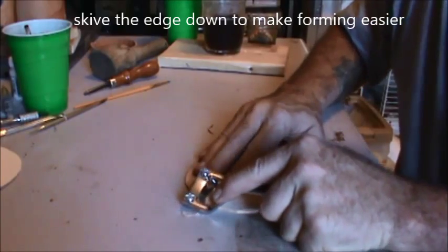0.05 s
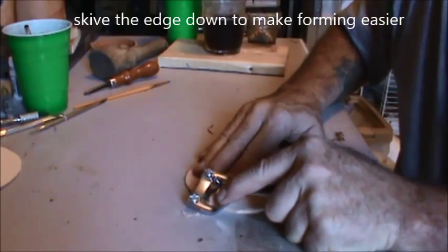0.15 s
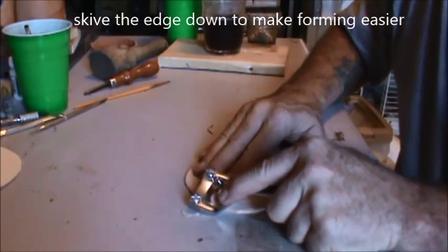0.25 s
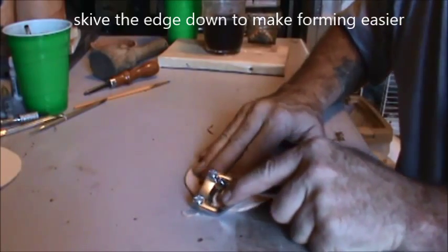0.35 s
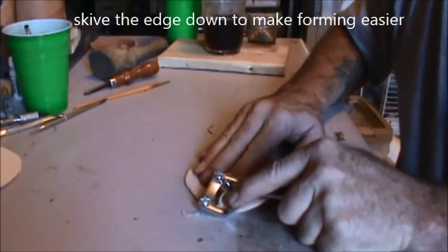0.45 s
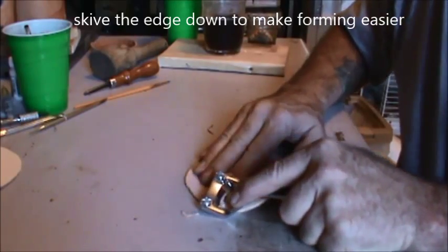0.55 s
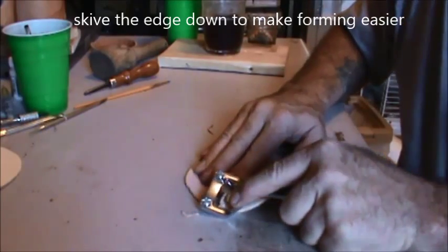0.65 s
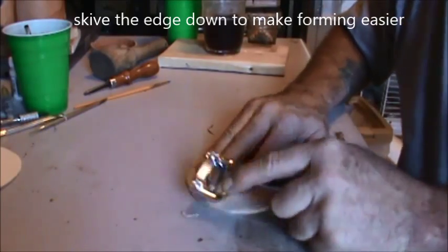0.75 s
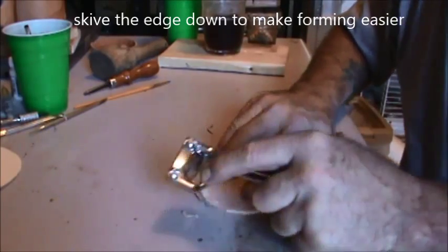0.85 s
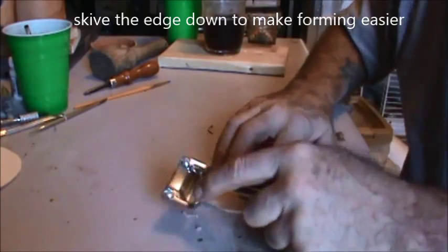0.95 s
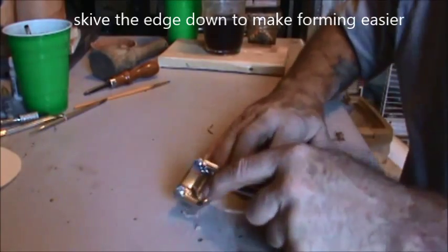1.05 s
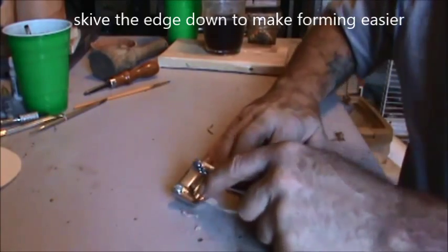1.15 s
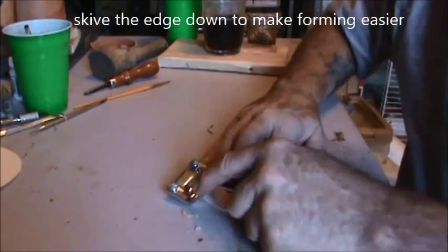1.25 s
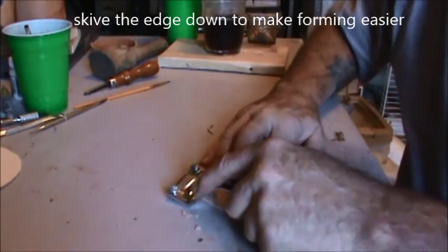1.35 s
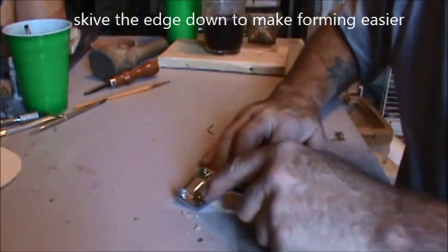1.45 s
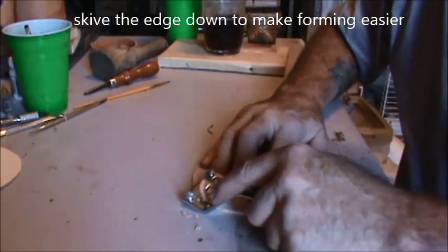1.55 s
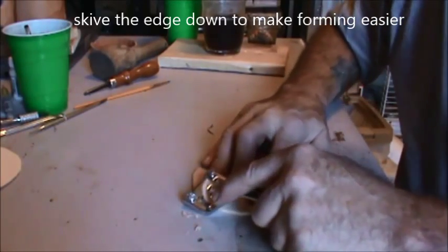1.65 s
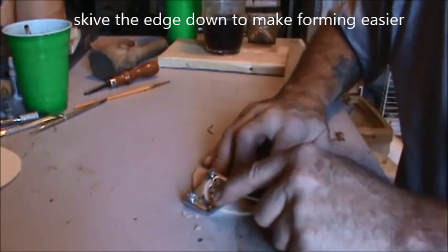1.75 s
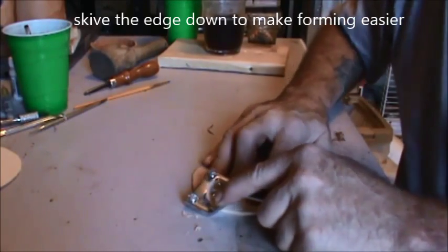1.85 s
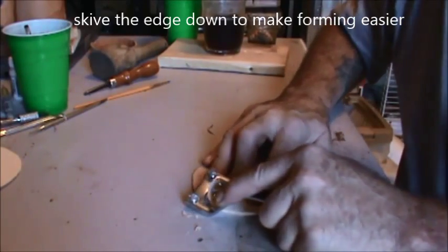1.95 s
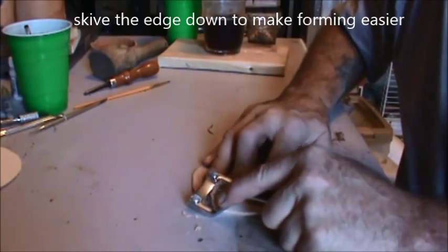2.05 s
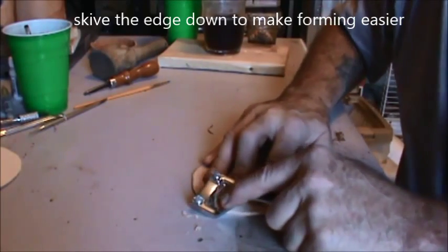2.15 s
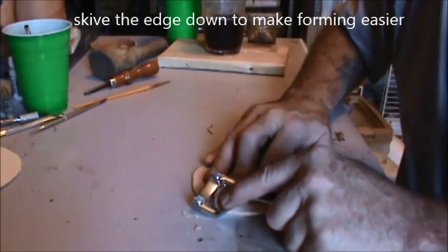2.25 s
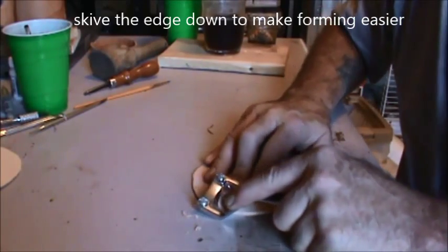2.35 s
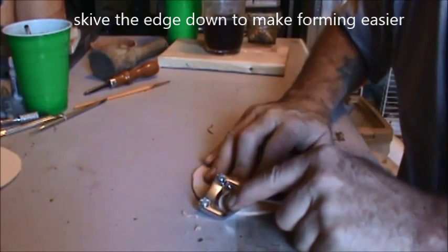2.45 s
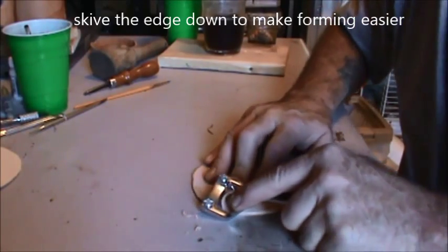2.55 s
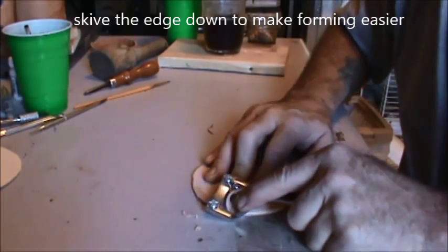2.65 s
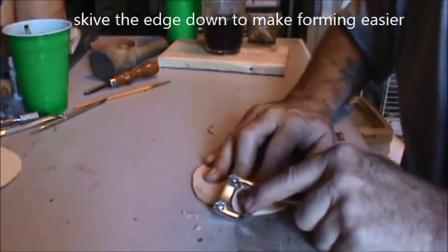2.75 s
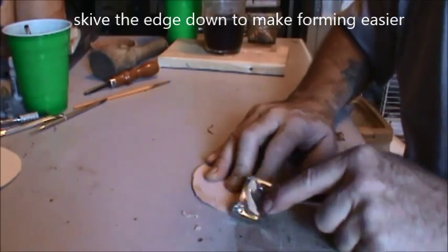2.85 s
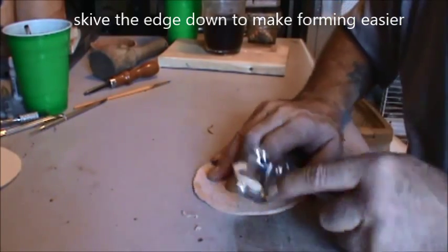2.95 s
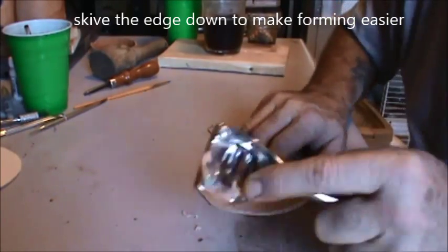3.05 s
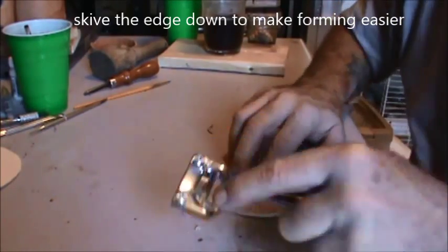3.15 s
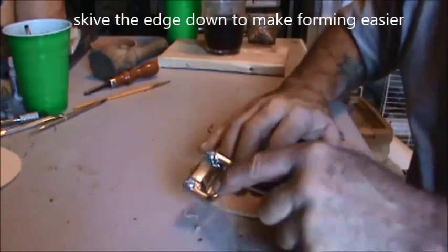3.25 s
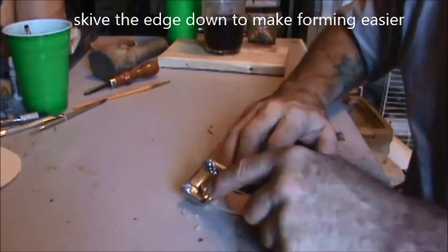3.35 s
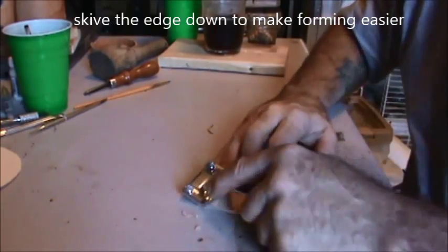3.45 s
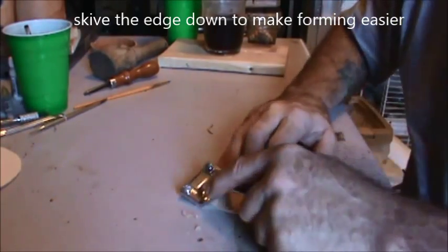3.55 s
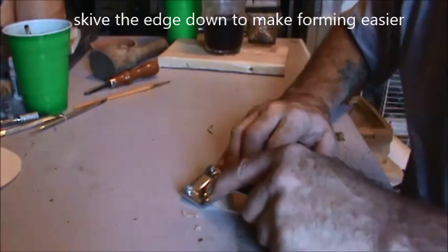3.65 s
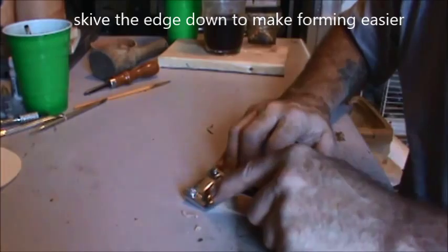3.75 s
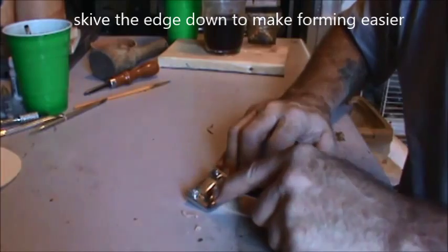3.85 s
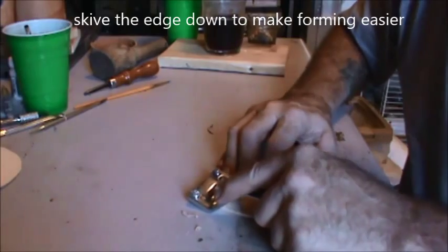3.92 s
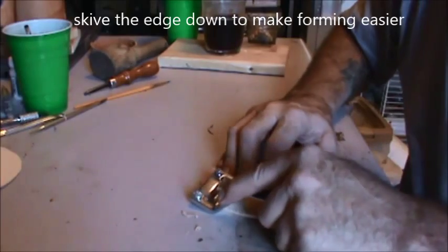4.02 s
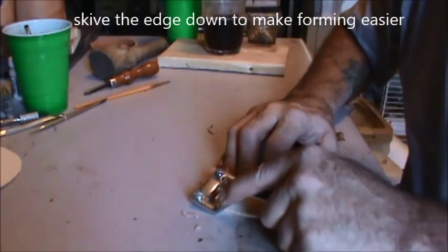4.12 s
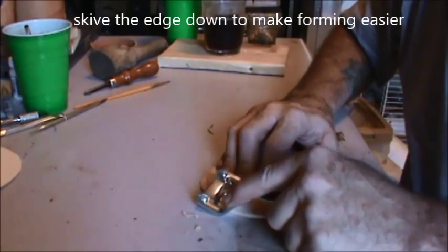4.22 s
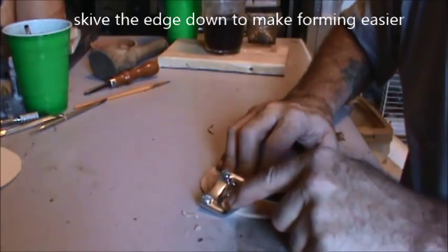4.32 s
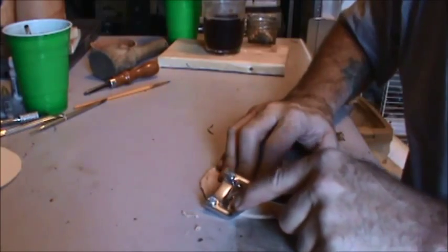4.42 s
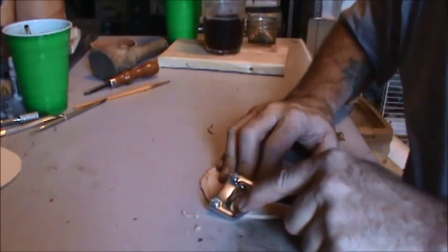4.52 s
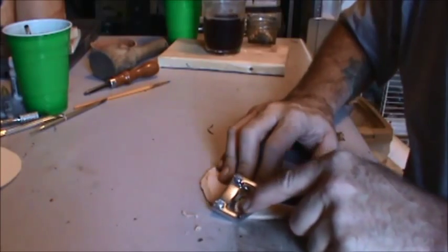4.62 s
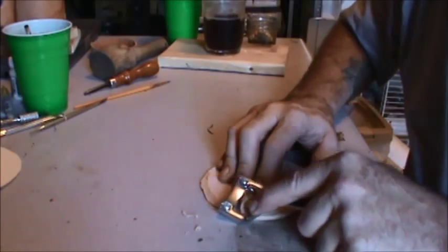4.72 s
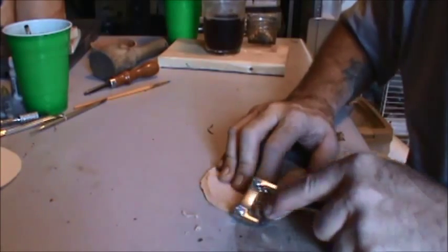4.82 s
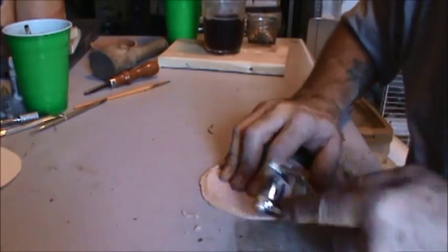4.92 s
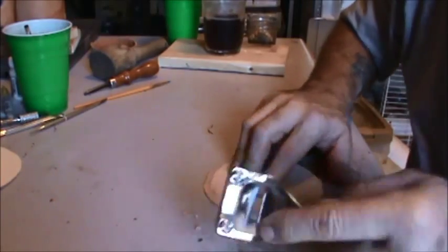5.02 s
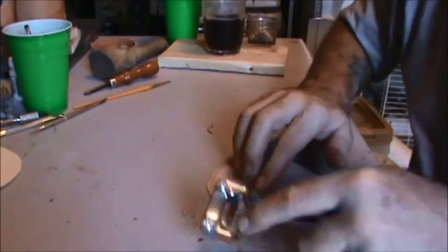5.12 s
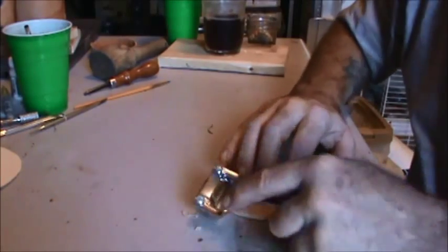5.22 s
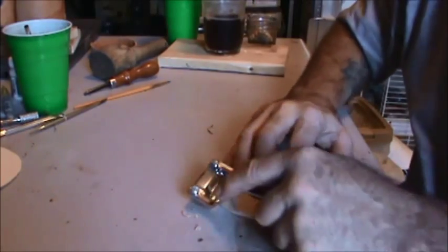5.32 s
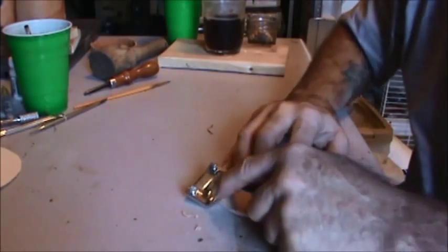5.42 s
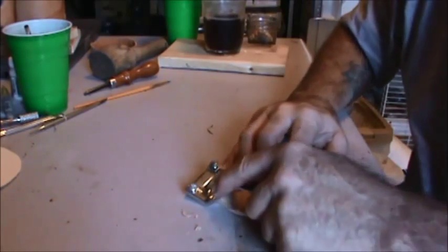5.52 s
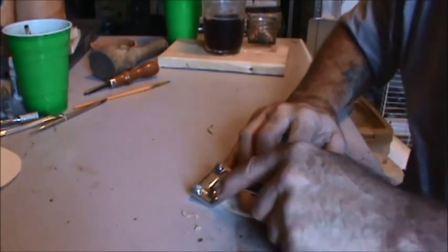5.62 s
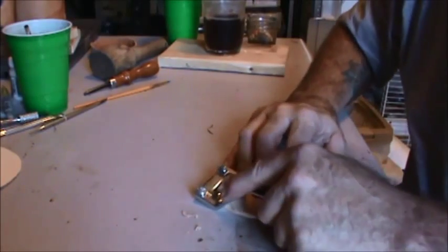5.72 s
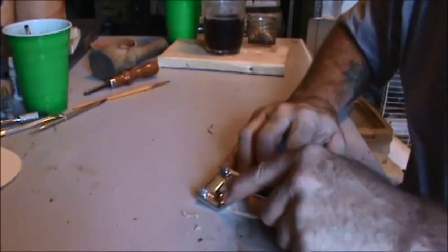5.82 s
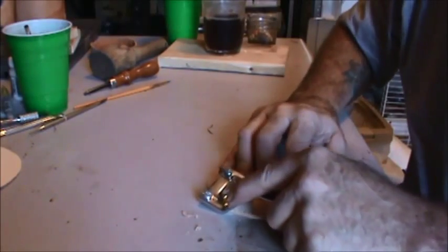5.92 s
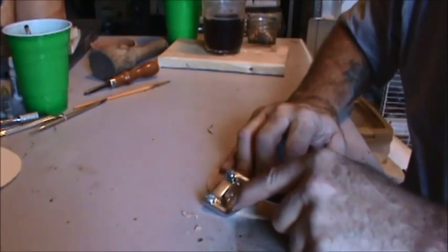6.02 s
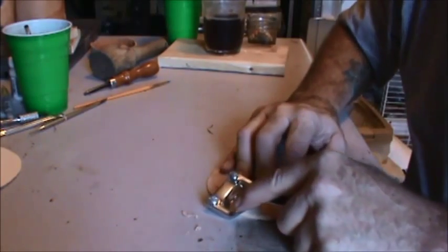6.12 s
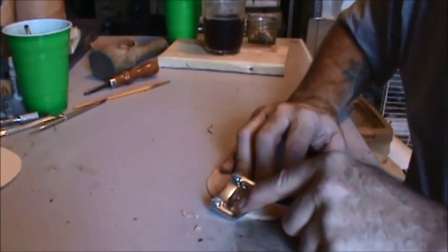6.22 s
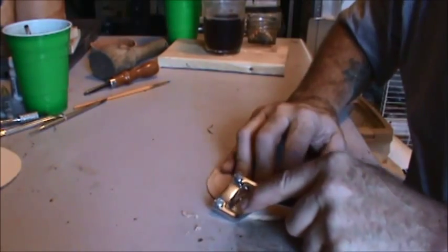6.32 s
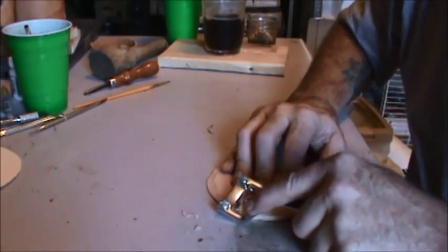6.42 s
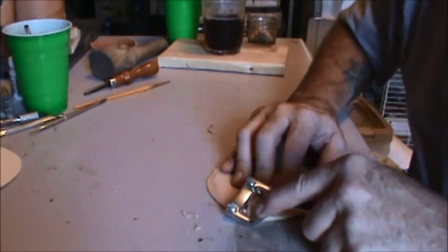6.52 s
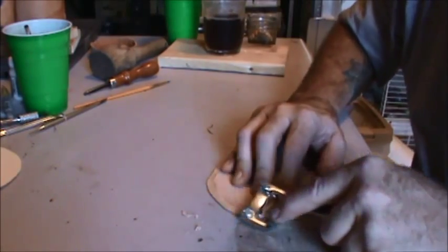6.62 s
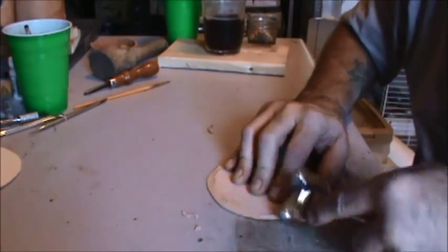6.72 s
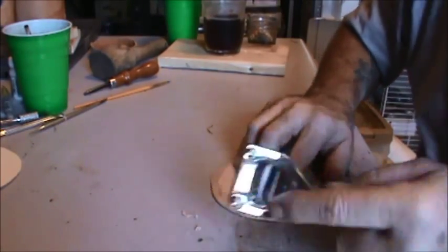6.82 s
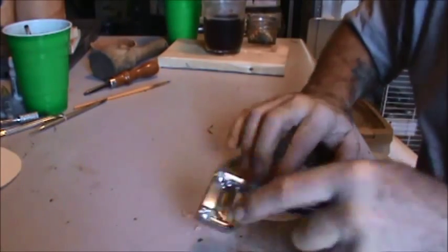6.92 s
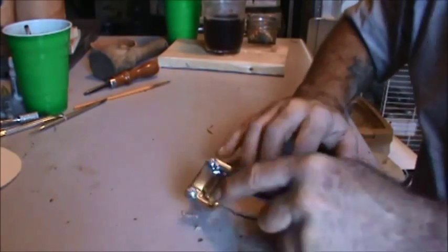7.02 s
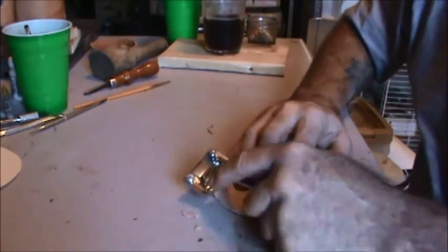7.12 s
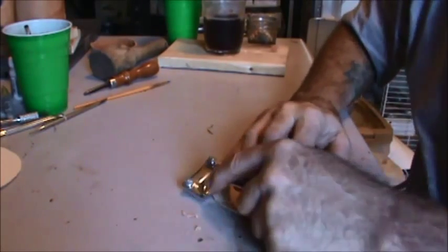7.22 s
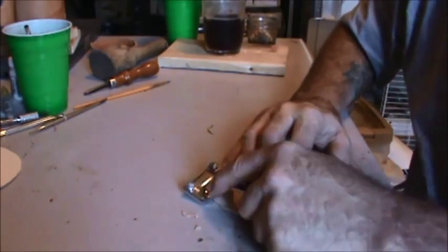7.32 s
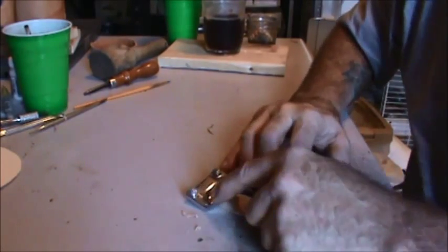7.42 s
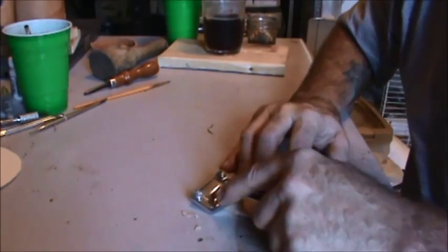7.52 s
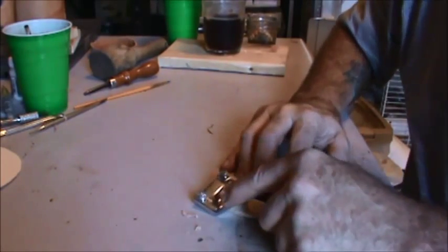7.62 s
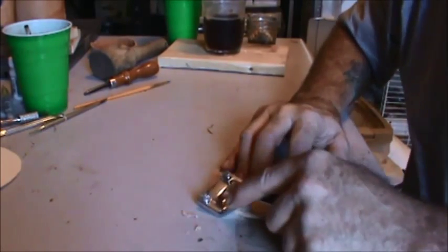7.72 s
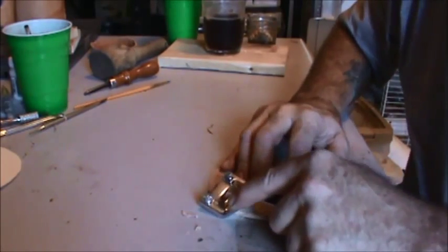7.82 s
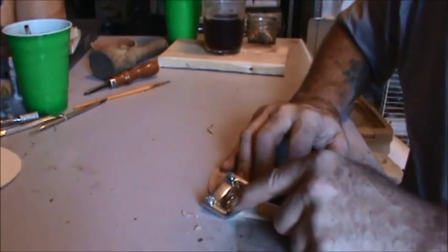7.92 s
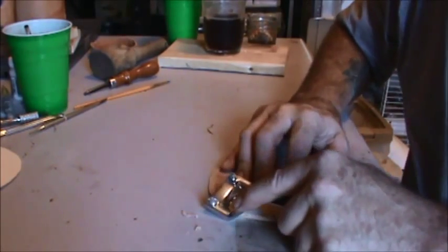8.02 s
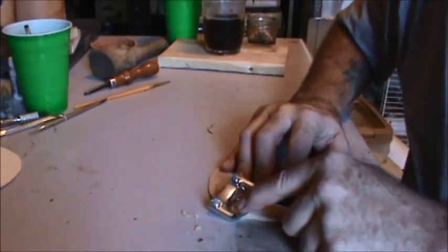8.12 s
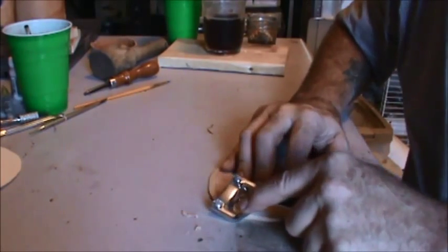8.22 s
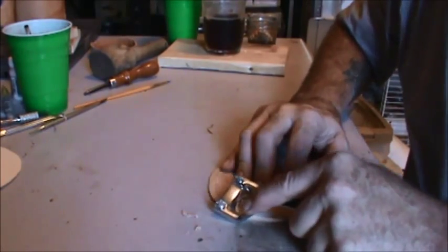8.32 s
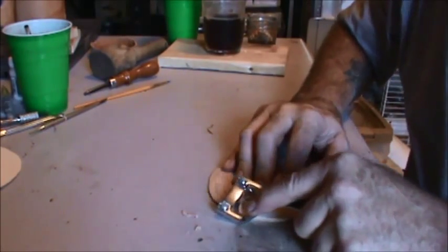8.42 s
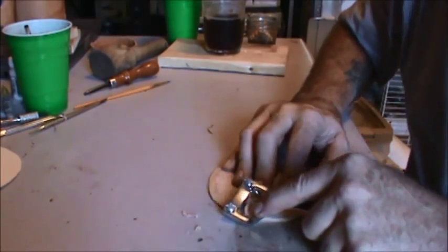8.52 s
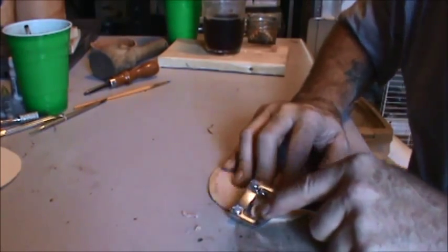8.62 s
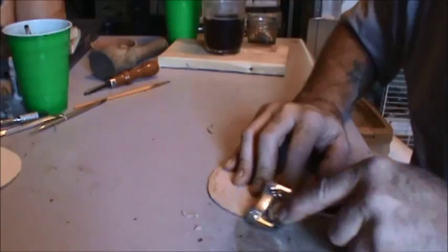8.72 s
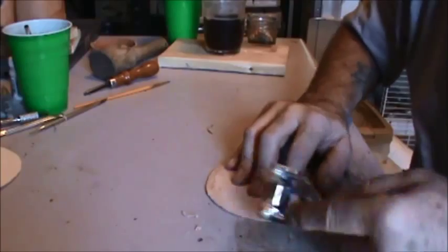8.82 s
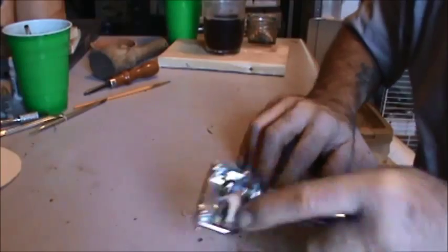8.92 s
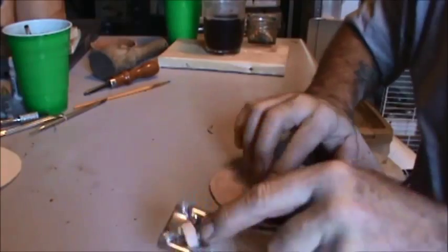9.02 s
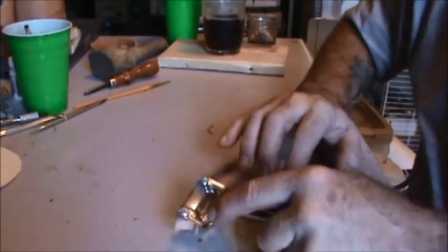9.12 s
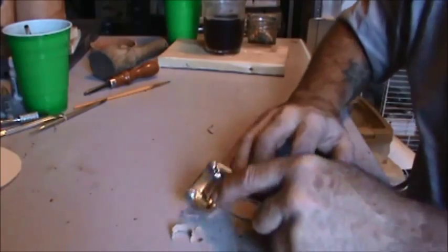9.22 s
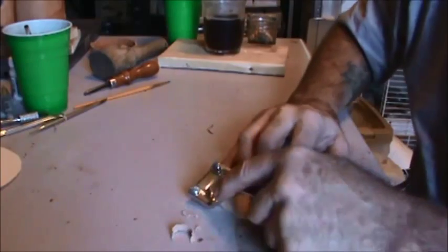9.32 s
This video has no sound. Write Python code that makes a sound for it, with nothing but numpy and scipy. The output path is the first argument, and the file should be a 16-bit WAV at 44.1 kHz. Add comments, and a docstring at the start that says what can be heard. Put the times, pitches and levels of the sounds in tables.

```python
"""A small metal skiver (a leather-shaving tool) is drawn round a leather disc on a wooden bench.
The blade tears fibres (a hiss), shakes the bench top (a hollow rub near 1 kHz), ticks as it catches
and squeaks thinly. Three of the five strokes end in a dull thud as the tool runs off the edge.
Between strokes the tool is lifted, carried back and set down with a knock.
A low rumble, soft air noise and the short echo of a quiet workshop lie below."""
import sys
import numpy as np
from scipy import signal
from scipy.fft import rfft, irfft, next_fast_len
from scipy.io import wavfile

SR = 44100
rng = np.random.default_rng(int(sys.argv[2]) if len(sys.argv) > 2 else 0)


def file_out(sig):
    """Save sig as 16-bit WAV at sys.argv[1]."""
    # one column per channel
    cols = np.atleast_2d(sig).T
    # limit, then scale
    lim = np.clip(cols, -1, 1)
    pcm = np.round(lim * 32767).astype(np.int16)
    wavfile.write(sys.argv[1], SR, pcm)


N = 412776
EDGE_S = .03   # fade before and after each stroke or lift

# The bench top's tones. Each row: pitch in Hz, level in dB, seconds to fade 60 dB before damping.
BENCH = [(425, -10, .07), (520, -9, .07), (630, -6, .07), (715, -6, .07), (880, -3, .06), (960, -4, .06),
         (1130, -2, .06), (1400, -5, .05), (1585, 1, .06), (1840, -9, .04), (2090, -14, .035),
         (2290, -16, .035), (2500, -18, .028), (2750, -23, .028), (3040, -23, .026), (3400, -26, .025),
         (3930, -23, .02), (4250, -33, .018)]
# Each tone is five close ones, each with a random pitch shift and left-right lean.
CLUSTERS = rng.standard_normal((len(BENCH), 5, 2))


def from_db(db):
    """Turns a level in dB into a gain."""
    return 10 ** (np.asarray(db) / 20)


def rms_one(x):
    """Scales a sound to an average (rms) level of 1."""
    return x / np.sqrt(np.mean(x ** 2) + 1e-20)


def at_hz(points, hz):
    """Reads between a table's rows, with octaves evenly spaced."""
    return np.interp(np.log(hz), np.log(np.array(points)[:, 0]), np.array(points)[:, 1])


def drift(rate_hz):
    """A smooth random wobble of size about 1."""
    r = np.exp(-80 * np.pi * rate_hz / SR)
    slow = signal.lfilter([1], [1, -2 * r, r * r], rng.standard_normal(N // 40 + 2002))[2000:]
    return np.interp(np.arange(N) / 40, np.arange(len(slow)), rms_one(slow))


def band_pass(x, range_hz, order=2):
    """Keeps the sound between two frequencies."""
    return signal.sosfilt(signal.butter(order, range_hz, "band", fs=SR, output="sos"), x)


def bands(x, low_hz=0, high_hz=SR):
    """Yields the centre in Hz and the sound of each half-octave band in the range."""
    edges_hz = 20 * 2 ** np.arange(0, 10, .5)
    for low, high in zip(edges_hz, edges_hz[1:]):
        centre = np.sqrt(low * high)
        if low_hz < centre < high_hz:
            yield centre, band_pass(x, [low, high])


def coloured(mid_side, spectrum, flicker_db, width_db):
    """Shapes a middle and a side noise into stereo; each band flickers on its own."""
    # Stereo width. Each row: frequency in Hz, side level against the middle in dB.
    widths = [(60, -38), (150, -14), (380, -9.5), (950, -1.5), (2380, -9.5), (5980, -12), (15000, -9.5)]
    out = 0
    for k, (hz, (mid, side)) in enumerate(bands(mid_side, spectrum[0][0] / 2, spectrum[-1][0] * 2)):
        gain = (-1) ** k * from_db(at_hz(spectrum, hz) + flicker_db * drift(2.7))
        out = out + gain * (mid + from_db(at_hz(widths, hz) + width_db) * side * [[1], [-1]])
    return rms_one(out)


def grains(per_s, spread_db):
    """Two streams of random clicks of uneven size."""
    sizes = from_db(spread_db * np.minimum(rng.exponential(1, (2, N)), 5)) * rng.choice([-1, 1], (2, N))
    return rms_one(sizes * (rng.random((2, N)) < per_s / SR))


def ring(force, hz, t60):
    """A push starts a pure tone that fades 60 dB in t60 seconds."""
    r, w = from_db(-60 / (t60 * SR)), 2 * np.pi * hz / SR
    return signal.lfilter([0, np.sin(w)], [1, -2 * r * np.cos(w), r * r], force + 1e-18)


def resonance(x, hz, width_hz):
    """Keeps the sound near one pitch, filtering twice for steep sides."""
    r = np.exp(-np.pi * max(width_hz, 10) / SR)
    b, a = [(1 - r * r) / 2, 0, (r * r - 1) / 2], [1, -2 * r * np.cos(2 * np.pi * hz / SR), r * r]
    return signal.lfilter(b, a, signal.lfilter(b, a, x))


def burst(t60):
    """A gain that starts at 1 and fades 60 dB in t60 seconds."""
    return from_db(-60 * np.arange(int(t60 * SR)) / (t60 * SR))


def add(track, s, sound):
    """Mixes a sound in at s seconds."""
    i = round(s * SR)
    track[..., i:i + sound.shape[-1]] += sound[..., :N - i]


def level_curves(moves):
    """Joins timed levels into curves in dB, silent between moves."""
    quiet = [-90] * (len(moves[0][0]) - 1)
    rows = [row for m in moves for row in [(m[0][0] - EDGE_S, *quiet), *m, (m[-1][0] + EDGE_S, *quiet)]]
    s, *levels = np.transpose(rows)
    return [np.interp(np.arange(N) / SR, s, column) for column in levels]


def air():
    """Soft, wide room air and microphone hiss."""
    # Each row: frequency in Hz, relative level in dB.
    spectrum = [(12, -34), (20, 11), (60, -7), (134, -3.5), (198, -1.5), (678, -8), (949, -9.5),
                (1710, -10), (2200, -7.5), (3160, -10), (8890, -14.5), (14700, -17), (16000, -21)]
    return from_db(-48.5) * coloured(rng.standard_normal((2, N)), spectrum, flicker_db=1.5, width_db=8.35)


def rumble(cut_db, rustle_db):
    """The bench rumbles with the hiss, and swells as if an arm leaned on it."""
    # The rumble's colour. Each row: frequency in Hz, relative level in dB.
    spectrum = [(12, -46), (20, -24), (32, -8.5), (76, -1), (136, -6.5), (203, -33), (315, -13), (366, -25),
                (400, -26), (520, -36), (640, -60)]
    # The swells. Each row: time in seconds, level in dB, half length in seconds.
    leans = [(0.005, -40.5, 0.015), (2.94, -42, 0.036), (5.006, -47.5, 0.04), (6.5, -59, 0.02),
             (7.583, -54, 0.1), (8.703, -45, 0.041), (9.33, -40.5, 0.03)]
    t = np.arange(N) / SR
    work_db = np.maximum(cut_db, rustle_db - 10.5)
    shaking = from_db(-48 + 0.68 * (work_db + 37)) + from_db(-60.5)   # never quite still
    shaking += sum(from_db(db) * np.exp(-((t - s) / half_s) ** 2) for s, db, half_s in leans)
    return shaking * coloured(rng.standard_normal((2, N)), spectrum, flicker_db=1.5, width_db=0.1)


def workshop(x):
    """The walls return a short echo, different on each side."""
    # Each row: frequency in Hz, seconds to fade 60 dB.
    fades = [(120, 0.37), (400, 0.28), (1200, 0.26), (3000, 0.29), (8000, 0.25)]
    t, noise = np.arange(SR // 2) / SR, rng.standard_normal((2, SR // 2))
    echo = sum(band * from_db(-60 * t / at_hz(fades, hz)) for hz, band in bands(noise))
    echo = (echo + 0.475 * echo[::-1]) * np.clip(t / 0.0017, 0, 1)
    return signal.fftconvolve(x[None], echo / np.sqrt(np.sum(echo ** 2) / 2), axes=1)[:, :N]


def bench(force, colour_db, luck_db, damping):
    """A push rings the bench top's tones, each a bit louder or softer by chance; peak about 1."""
    # The small top gives little bass and wood swallows treble: low and high limit in Hz.
    range_hz = [400, 4400]
    out, lucks = 0, luck_db * rng.standard_normal(len(BENCH))
    for (hz, level_db, t60), luck, cluster in zip(BENCH, lucks, CLUSTERS):
        for shift, lean in cluster:
            tone = ring(force, hz * (1 + 0.021 * shift), t60 / damping)
            gain = from_db(level_db + colour_db(np.log2(hz)) + luck + 1.5 * lean * np.array([[1], [-1]]))
            out = out + gain * tone / np.abs(tone).max()
    out = band_pass(out, range_hz, order=4)
    return out / np.abs(out.mean(axis=0)).max()


def knocks():
    """The tool lands unevenly. Gives the wood's sound and the loudness curve of a metal crack."""
    # Each row: start in seconds, level in dB, contact in seconds, tilt in dB per octave, crack in dB.
    landings = [(0.854, -10.5, 0.0031, -1, -12), (1.383, 1, 0.0098, 3.5, -23),
                (3.596, -1.5, 0.0094, -0.3, -36), (5.541, -0.5, 0.0085, 4.7, -25),
                (7.375, 0.5, 0.009, 0.2, -22.5)]
    # The whole bench thumps. Each row: pitch in Hz, width in Hz, level against the knock in dB.
    thumps = [(140, 95, -31.5), (252, 89, -28)]
    # The dry, pitchless clack: low and high limit in Hz.
    clack_hz = [447, 2190]
    wood, crack = np.zeros((2, N)), np.zeros(N)
    t, tail = np.arange(SR // 5) / SR, burst(0.055)
    for s, peak_db, contact_s, tilt_db, crack_db in landings:
        noise = rng.standard_normal(len(t))
        push = noise * np.exp(-(t / contact_s) ** 4)
        ringing = bench(push, lambda octave: tilt_db * octave, luck_db=1.5, damping=1.6)
        add(wood, s, from_db(peak_db) * ringing)
        clack = rms_one(band_pass(noise, clack_hz))[:len(tail)] * tail
        add(wood, s, from_db(peak_db - 11.5) * clack)
        for hz, width_hz, level_db in thumps:
            thump = resonance(np.abs(push), hz, width_hz)
            add(wood, s, from_db(peak_db + level_db) * thump / np.abs(thump).max())
        add(crack, s, from_db(crack_db) * burst(0.078))
    return wood, crack


def ticks(cut_db):
    """The blade catches and lets go. Gives small bench taps and the loudness curve of the snaps."""
    # Each row: start in seconds, base level in dB, bench tap against that level in dB.
    catches = [(0.1405, -8.5, -20.5), (0.295, -16.5, -12), (0.408, -16.5, -17), (0.4316, -18, -17),
               (0.5704, -14.5, -18), (0.631, -22.5, -11), (0.663, -26, -10), (0.7687, -13.5, -18),
               (0.9642, -21, -17), (1.0501, -23, -17), (1.6288, -22, -29), (1.706, -26.5, -13),
               (1.8484, -26, -14), (1.9894, -30, -7.5), (2.05, -31, -14), (2.1808, -25, -7),
               (2.598, -19.5, -20.5), (3.0567, -15.5, -12.5), (3.3572, -31.5, -4), (3.5476, -30.5, -20),
               (3.8752, -25.5, -12), (3.9283, -22, -15), (3.982, -25.5, -13), (4.002, -23.5, -10.5),
               (4.0244, -20.5, -17), (4.131, -24, -10), (5.161, -25, -16.5), (6.081, -24.5, -9),
               (6.2665, -24, -12), (6.2976, -23.5, -12), (6.3714, -21, -27.5), (6.718, -19, -9),
               (6.742, -11, -13), (6.7884, -5, -27), (7.5013, -20.5, -11), (7.6081, -15.5, -16.5),
               (7.7712, -23, -10), (8.0645, -25, -17), (8.1479, -32, -8), (8.4262, -24.5, -10),
               (8.5006, -23.5, -8), (8.9166, -14, -22), (9.292, -32, 1)]
    wood, rustle, faint_per_s = np.zeros((2, N)), burst(0.068), 8
    faint = (rng.random(N) < faint_per_s / SR) * rng.exponential(1, N) * from_db(cut_db - 9)
    snap = signal.fftconvolve(faint, rustle)[:N]
    t = np.arange(SR // 16) / SR
    for s, level_db, tap_db in catches:
        push = rng.standard_normal(len(t)) * from_db(-60 * t / 0.031)
        tap = bench(push, lambda octave: 0.52 * octave, luck_db=3, damping=1.66)
        add(wood, s, from_db(level_db + tap_db) * tap)
        add(snap, s, from_db(level_db - 18.5) * burst(0.0075))   # the first instant of the catch
        add(snap, s, from_db(level_db - 15.5) * rustle)
    return wood, snap


def crackle():
    """The bright, grainy noise that cracks and snaps are made of."""
    # Each row: frequency in Hz, relative level in dB.
    spectrum = [(400, 2), (880, -12), (1500, -13), (2510, 14), (3690, -6), (5070, 16), (5660, -1.5),
                (7100, 6), (12900, -12.5), (16000, -28)]
    return coloured(grains(per_s=12000, spread_db=2.5), spectrum, flicker_db=1, width_db=0.1)


def run_offs():
    """The tool slips off the edge and thuds on the bench, damped by hand and leather."""
    # Each row: peak time in seconds, level in dB, swell and fade in seconds, centre pitch in Hz.
    scuffs = [(5.001, -9, 0.014, .011, 886), (6.832, -4.5, 0.013, 0.0085, 540),
              (8.901, -6, 0.015, 0.011, 900)]
    wood, t = np.zeros((2, N)), np.arange(-SR // 20, SR // 8) / SR
    for s, level_db, swell_s, fade_s, hz in scuffs:
        push = rng.standard_normal(len(t)) * np.exp(-(t / np.where(t < 0, swell_s, fade_s)) ** 2)
        thud = bench(push, lambda octave: -15 * (octave - np.log2(hz)) ** 2, luck_db=1, damping=1.15)
        add(wood, s + t[0], from_db(level_db) * thud)
    return wood


def squeaks():
    """Noise in one narrow blade resonance swells and fades."""
    # Each row: start and end in seconds, pitch and width in Hz, level in dB.
    squeals = [(0.456, 0.575, 4500, 400, -46), (4.791, 4.984, 6600, 700, -45.5),
               (4.815, 4.998, 10200, 1500, -39), (5.134, 5.193, 9785, 2400, -37),
               (6.478, 6.64, 3440, 150, -47), (8.398, 8.722, 5300, 180, -52), (8.7, 8.89, 5290, 400, -40),
               (8.758, 8.892, 4270, 300, -38)]
    out = np.zeros(N)
    for start, end, hz, width_hz, level_db in squeals:
        tone = rms_one(resonance(rng.standard_normal(SR // 2), hz, width_hz))[:int((end - start) * SR)]
        add(out, start, from_db(level_db) * tone * np.sqrt(np.hanning(len(tone))))
    return out


def settling():
    """After a knock the tool slides into place. Gives the rub's level in dB."""
    # Each row: peak time in seconds, level in dB, seconds to fade 20 dB.
    slides = [(1.548, -32.5, 0.16), (3.719, -42, 0.04), (5.68, -42.5, .35), (7.491, -34, 0.19)]
    t, rise_s = np.arange(N) / SR, 0.052
    curves = [db - 20 * np.where(t < s, (s - t) / rise_s, (t - s) / fade_s) for s, db, fade_s in slides]
    return np.max(curves, axis=0)


def rub(peaks, wander_db, side_db):
    """Tiny slips of the blade feed resonances that come and go as the grip shifts."""
    slips, out = grains(per_s=5000, spread_db=2.46) * from_db(1.6 * drift(20)), 0
    for hz, width_hz, level_db in peaks:
        out = out + from_db(level_db + wander_db * drift(10.5)) * resonance(slips, hz, 1.26 * width_hz)
    mid, side = out
    return rms_one(mid + from_db(side_db) * side * [[1], [-1]])


def rubbing(cuts, cut_db, rub_db, carry_db):
    """The moving tool makes the bench, its own hollow body and its blade hum."""
    # Their resonances. Each row: pitch in Hz, base width in Hz, relative level in dB.
    bench_peaks = [(436.3, 27, -7), (655, 180, -8.5), (811, 120, -3.5), (968, 320, 0), (1064, 72, -10.5),
                   (1394.5, 79, -8), (1908, 22, -9.5)]
    body_peaks = [(415, 116, -1), (2257, 77, -2), (2440, 170, -2.5), (2590, 110, -6)]
    blade_peaks = [(3010, 90, 0.5), (3486, 97, -2), (4170, 140, 1), (5290, 85, -0.5), (6710, 200, 0)]
    # The body's hum against the hiss in dB, one value a stroke.
    hum_db = [-6, -16, -12, -15.5, -18]
    stroke = np.searchsorted([cut[0][0] - EDGE_S for cut in cuts[1:]], np.arange(N) / SR)
    hum = from_db(cut_db + np.take(hum_db, stroke)) + from_db(carry_db)
    wood = from_db(rub_db) * rub(bench_peaks, wander_db=1, side_db=-13.5)
    body = hum * rub(body_peaks, wander_db=0.87, side_db=-28)
    blade = from_db(cut_db - 14) * rub(blade_peaks, wander_db=3, side_db=-13)
    return wood + body + blade


def fibre_hiss(cut_db, rustle_db, slide_db):
    """Tearing fibres blur into a hiss; lifts and slides rustle with the same sound."""
    # Each row: frequency in Hz, relative level in dB.
    spectrum = [(150, -11), (400, -9.5), (880, -6), (1500, -9), (2080, -9), (2490, -9.5), (4290, -7.5),
                (4730, -18), (5220, -5), (5940, -10), (9010, -7), (14000, -17.5), (16000, -21)]
    tears = grains(per_s=9000, spread_db=1) * from_db(2.2 * drift(18.6))
    loudness = from_db(cut_db) + from_db(rustle_db) + from_db(slide_db - 9)
    return loudness * coloured(tears, spectrum, flicker_db=0.92, width_db=0.082)


def scene():
    """Strokes, lifts, knocks and ticks in the workshop, over rumble and air."""
    # The jerky cuts, one list a stroke. Each row: time in seconds, hiss in dB, bench rub in dB.
    cuts = [
        [(0.0, -41, -44), (0.074, -62, -60), (0.154, -39.5, -39), (0.28, -48, -39.5), (0.34, -51, -51),
         (0.44, -38, -37.5), (0.584, -36, -39), (0.622, -62.5, -62), (0.69, -33.5, -45), (0.726, -54, -62),
         (0.778, -38.5, -45), (0.8, -49.5, -60.5), (0.84, -30, -60)],
        [(1.82, -67, -75), (1.856, -50, -59), (1.946, -67, -57), (2.104, -54.5, -58.5), (2.19, -38.5, -38),
         (2.268, -60, -66), (2.424, -38.5, -38.5), (2.55, -70, -63.5), (2.62, -46, -44.5), (2.73, -38.5, -39.5),
         (2.784, -48, -46), (2.93, -31, -29.5), (3.04, -46.5, -38)],
        [(3.76, -58.5, -59), (3.81, -51, -45), (3.95, -53, -61), (4.064, -52, -52), (4.14, -47, -49),
         (4.2, -60, -58.5), (4.3, -41.5, -39.5), (4.41, -48, -45), (4.57, -40.5, -39.5), (4.65, -48, -47.5),
         (4.94, -31, -32), (4.97, -30.5, -29), (5.015, -35.5, -26)],
        [(5.9, -70, -69), (5.97, -52, -47.5), (6.328, -48, -47), (6.434, -49, -49), (6.49, -41, -40.5),
         (6.69, -33, -31), (6.74, -30.5, -30.5), (6.785, -31.5, -23), (6.82, -37, -17), (6.86, -35, -46.5)],
        [(7.76, -58, -51.5), (7.81, -47, -54), (7.95, -71, -52.5), (8.164, -47.5, -46), (8.25, -45, -39),
         (8.36, -56.5, -51.5), (8.41, -47.5, -39), (8.536, -43.5, -41.5), (8.632, -34.5, -32),
         (8.71, -40, -35.5), (8.84, -25.5, -27), (8.87, -32, -24), (8.92, -43.5, -21)],
    ]
    # The tool is carried back, one list a lift. Each row: time in seconds, rustle in dB, body hum in dB.
    lifts = [
        [(0.89, -39, -55.5), (0.95, -45.5, -54), (0.98, -35.5, -52.5), (1.03, -43.5, -51), (1.056, -41, -58),
         (1.136, -56, -51), (1.29, -66, -77), (1.35, -50, -78)],
        [(3.06, -36.5, -49), (3.25, -41.5, -49.5), (3.34, -58, -70), (3.52, -62, -78), (3.56, -41, -60)],
        [(5.04, -39, -48), (5.09, -37, -44.5), (5.174, -34, -43.5), (5.23, -47.5, -44.5), (5.32, -51, -45.5),
         (5.51, -48, -74.5)],
        [(6.88, -35, -53), (6.93, -42, -58), (7.0, -43, -63), (7.06, -62, -76), (7.17, -60, -86),
         (7.32, -46.5, -64), (7.36, -46.5, -58)],
        [(8.94, -41, -55), (9.074, -38, -48.5), (9.115, -44.5, -46), (9.2, -51, -46), (9.3, -51, -54.5),
         (9.34, -45, -51), (9.36, -55, -66)],
    ]
    cut_db, press_db = level_curves(cuts)
    rustle_db, carry_db = level_curves(lifts)
    slide_db = settling()
    hiss = fibre_hiss(cut_db, rustle_db, slide_db)
    hum = rubbing(cuts, cut_db, np.maximum(press_db, slide_db), carry_db)
    landings, crack = knocks()
    taps, snap = ticks(cut_db)
    near = hiss + hum + landings + taps + (crack + snap) * crackle() + squeaks() + run_offs()
    return near + rumble(cut_db, rustle_db) + air() + from_db(-5.5) * workshop(near.mean(axis=0))


def record(dry):
    """Shifts the right side slightly ahead, rounds the loudest knocks and cuts the highest treble."""
    # The right microphone opening leads the left. Each row: frequency in Hz, lead in radians.
    leads = [(30, 0.069), (250, 0.098), (600, 1), (950, 0.24), (1250, 0.61), (1650, 0.38), (2800, 0.45),
             (4300, 0)]
    size, ceiling, cutoff_hz = next_fast_len(N + SR // 10), .96, 16200
    lead = at_hz(leads, np.maximum(np.arange(size // 2 + 1) * SR / size, 1))
    shifted = irfft(rfft(dry, size) * np.exp(.5j * lead * [[-1], [1]]), size)[:, :N]
    rounded = shifted / (1 + (shifted / ceiling) ** 4) ** (1 / 4)
    return signal.sosfilt(signal.cheby2(24, 70, cutoff_hz, fs=SR, output="sos"), rounded)


dry = scene()
out = record(dry)
file_out(out)
```